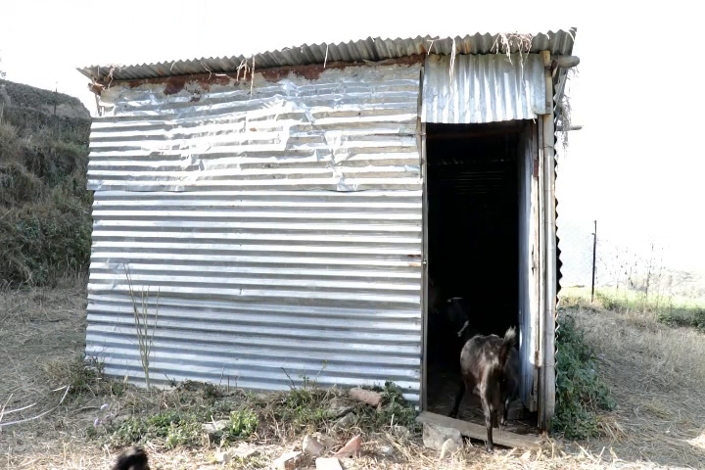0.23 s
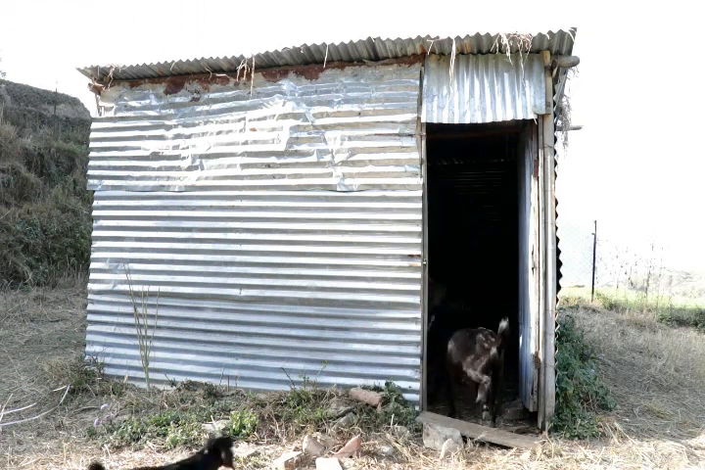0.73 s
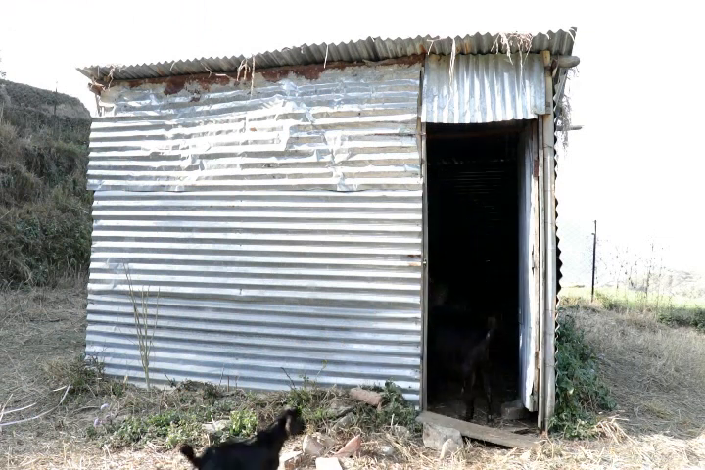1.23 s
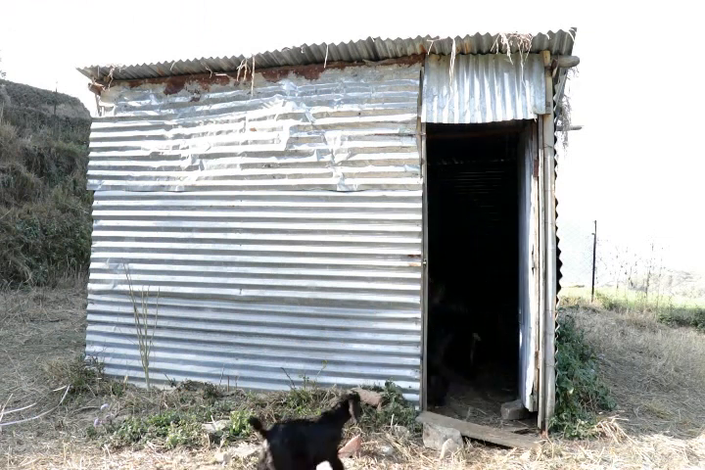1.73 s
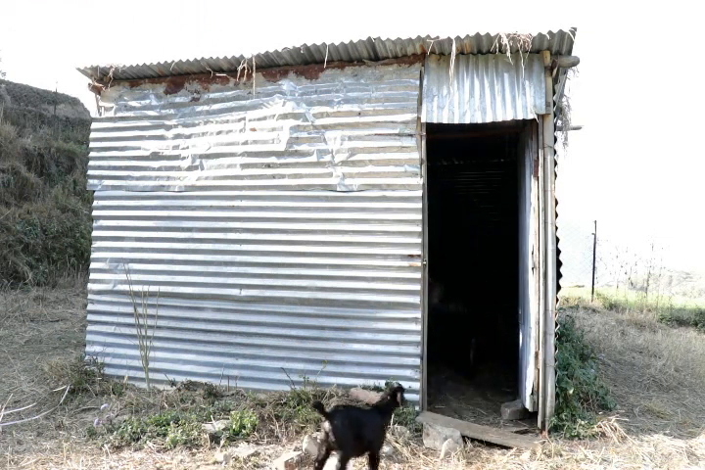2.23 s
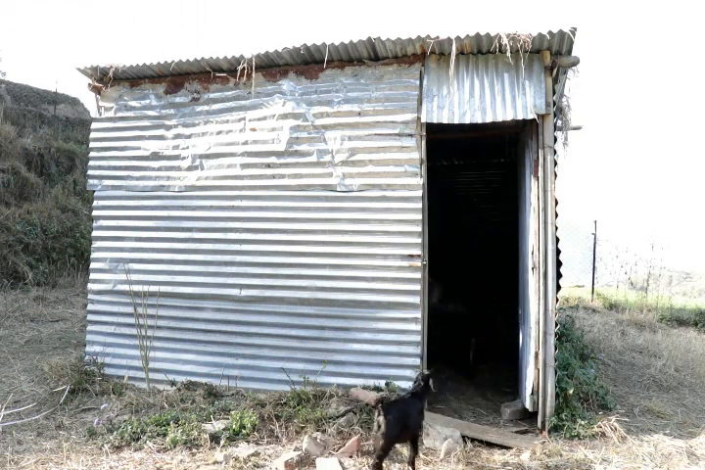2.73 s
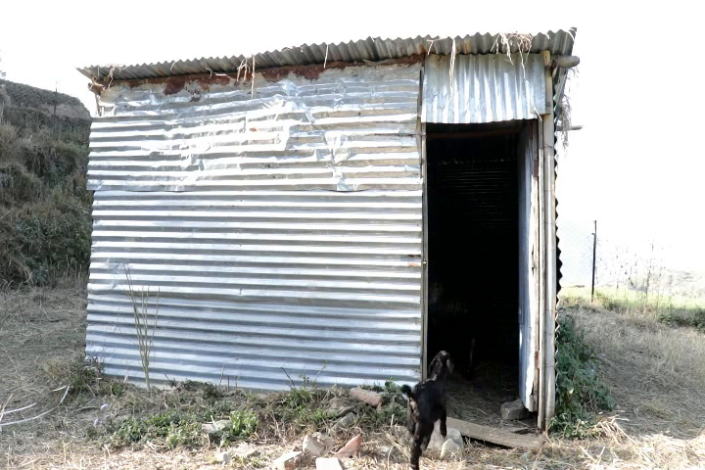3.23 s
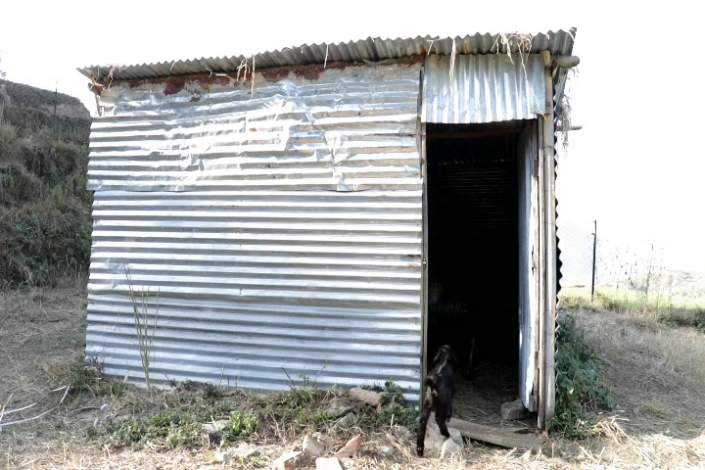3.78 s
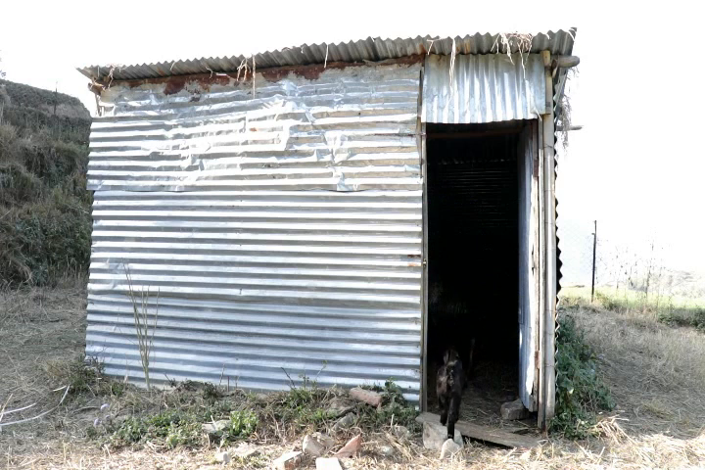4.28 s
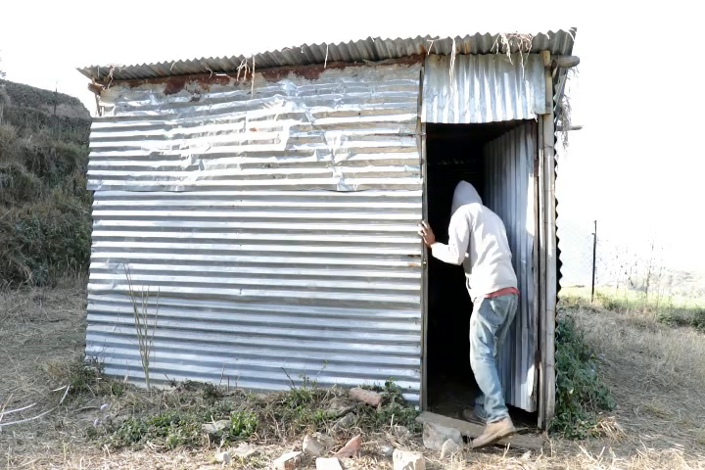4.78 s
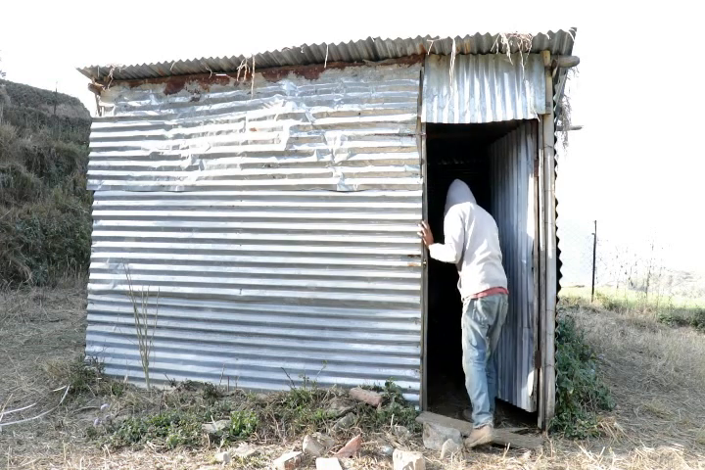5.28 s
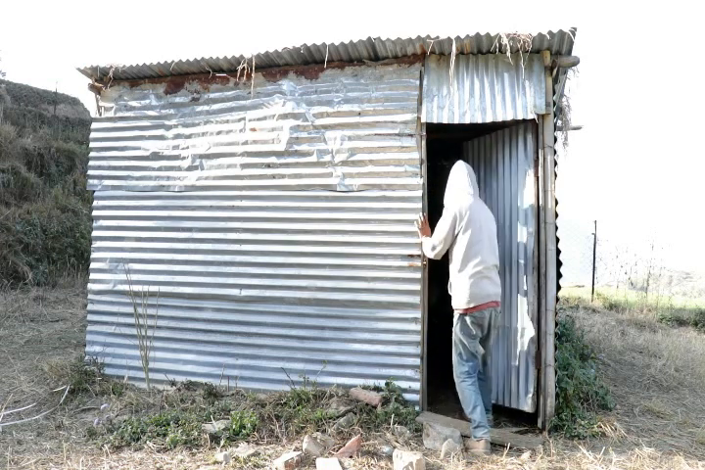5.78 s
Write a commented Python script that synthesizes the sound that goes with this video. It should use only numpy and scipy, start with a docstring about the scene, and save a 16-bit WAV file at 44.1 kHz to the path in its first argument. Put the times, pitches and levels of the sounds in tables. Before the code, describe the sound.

Goats shuffle through dry straw, their hooves knocking lightly on boards. One hard, loud bang sets a corrugated iron shed booming and ringing out. The soft steps go on with a few faint bird chirps, then a sheet-metal door is dragged, scraping, juddering and slapping its frame before a dull bump. Heard outdoors from a few metres away, over a light breeze and low rumble.

```python
"""Goats shuffle through dry straw and knock on boards, until one hard blow sets an iron shed booming.
Its corrugated sheets ring out in a wash of metal modes. Later the sheet door is dragged: it scrapes,
judders and slaps against its frame, ending on a dull bump. Thin squeaks and bird chirps echo off the
walls, and a light breeze with a low rumble lies under it all."""
import sys
import numpy as np
from scipy import signal
from scipy.fft import rfft, irfft, next_fast_len
from scipy.io import wavfile
from scipy.ndimage import map_coordinates

SR = 44100
rng = np.random.default_rng(int(sys.argv[2]) if len(sys.argv) > 2 else 0)


def dump_mix(stems):
    """Bounce the given channels to the path in sys.argv[1] as a 16-bit WAV at rate SR."""
    frames = np.atleast_2d(stems).T  # one column per channel
    limited = np.clip(frames, -1, 1)  # hard clip at full scale
    pcm = np.round(limited * 32767).astype(np.int16)
    wavfile.write(sys.argv[1], SR, pcm)


N = 265041

# tone colour of the door leaf, slapped or scraped: f/Hz, level/dB
DOOR_COLOUR = [(35, -17), (95, -4), (170, 1), (250, -10), (380, -0.5), (600, 1), (860, 2.5), (1300, 2.5),
               (1700, 0), (2500, -2.5), (3800, -7), (5000, -4), (6500, -17), (10000, -16.5), (15000, -22)]


def amp(db):
    """Decibels to gain."""
    return 10 ** (np.asarray(db) / 20)


def unit(x):
    """Scale to rms 1."""
    return x / np.sqrt(np.mean(x ** 2) + 1e-20)


def along(points, hz):
    """Read a curve of (f/Hz, value) points on a log frequency axis."""
    f, v = np.transpose(points)
    return np.interp(np.log(hz + 1), np.log(f), v)


def wobble(rate, size=N):
    """Smooth random modulation, rate knots a second."""
    knots = rng.standard_normal(int(size * rate / SR) + 4)
    return map_coordinates(knots, [np.arange(size) * rate / SR])


def filtered(x, response):
    """Equalise x with the gain curve response(hz)."""
    m = next_fast_len(len(x) + SR // 2)
    return irfft(rfft(x, m) * response(np.fft.rfftfreq(m, 1 / SR)), m)[:len(x)]


def noise(colour_db, size=N):
    """Noise of rms 1 with the spectral shape colour_db(hz)."""
    return unit(filtered(rng.standard_normal(size), lambda hz: amp(colour_db(hz))))


def dying(x, decay):
    """Let each frequency of x fade at its own speed, given as (f/Hz, t60/s) points."""
    hz, t, spectrum = signal.stft(x, SR, nperseg=256)
    damping = amp(-60 * t / along(decay, hz)[:, None])
    return signal.istft(spectrum * damping, SR, nperseg=256)[1][:len(x)]


def fade(t, t60):
    """Exponential decay by 60 dB in t60 seconds."""
    return np.exp(-np.log(1000) * t / t60)


def attack(t, rise_s):
    """Onset from 0 to 1 with time constant rise_s."""
    return 1 - np.exp(-t / rise_s)


def tone(hz, t60, t):
    """One ringing mode, struck at a random phase."""
    return fade(t, t60) * np.sin(2 * np.pi * (hz * t + rng.random()))


def add(track, s, sound):
    """Mix a sound into the track at s seconds."""
    part = track[max(round(s * SR), 0):][:len(sound)]
    part += sound[:len(part)]


def dense_ring(colour_db, decay, thump_db, body_db, edge_db):
    """A second of crowded modes; where and how hard a contact lands sets the balance of four bands."""
    edges_hz = [30, 250, 700, 2900, 16000]  # thump, body, mids (at 0 dB), edge
    ring = noise(colour_db, size=SR)
    bands = [unit(filtered(ring, lambda hz: 1 / (1 + (lo / (hz + 1)) ** 10) / (1 + (hz / hi) ** 10)))
             for lo, hi in zip(edges_hz, edges_hz[1:])]
    return dying(amp([thump_db, body_db, 0, edge_db]) @ np.array(bands), decay)


def air(rumble_db=-52, breeze_db=-54):
    """The outdoor bed: a light, gently wavering breeze over a low rumble."""
    # tone colours of the rumble and the breeze: f/Hz, level/dB
    rumble_colour = [(12, -37), (20, -13), (45, 2.5), (70, -1), (105, 0.5), (166, -5), (300, -9.5),
                     (500, -16.5), (900, -82)]
    breeze_colour = [(120, -21), (220, 2.5), (500, 5), (820, 1.5), (1400, -2.5), (2700, -7), (4900, -14.5),
                     (15000, -21.5)]
    buffet_db, gust_db = 1.2 * wobble(7), .7 * wobble(9)
    rumble = amp(rumble_db + buffet_db) * noise(lambda hz: along(rumble_colour, hz))
    breeze = amp(breeze_db + gust_db) * noise(lambda hz: along(breeze_colour, hz))
    return rumble + breeze


def glide(length, start_hz, fall_oct_per_s, rough, bend=1):
    """A thin falling tone that swells and fades; pitch jitter gives it rasp."""
    progress = np.linspace(0, 1, int(length * SR))
    jitter = 1 + rough * wobble(900, size=SR)[:len(progress)]
    hz = start_hz * 2 ** (-fall_oct_per_s * length * progress ** bend) * jitter
    swell = np.sqrt(np.abs(np.sin(np.pi * progress)))
    return swell * np.sin(2 * np.pi * np.cumsum(hz) / SR)


def birds(length_s=.07):
    """Small, clean chirps: each holds its pitch, then drops ever faster."""
    # bird calls: t/s, starting f/Hz, level/dB
    calls = [(2.968, 3050, -51.5), (3.975, 4100, -64), (4.18, 4750, -56.5), (4.456, 4580, -53)]
    out = np.zeros(N)
    for s, start_hz, db in calls:
        add(out, s, amp(db) * glide(length_s, start_hz, fall_oct_per_s=5.6, rough=.035, bend=1.6))
    return out


def squeaks():
    """Thin, rasping squeaks that sag in pitch."""
    # squeaks: t/s, length/s, starting f/Hz, level/dB, jitter/share of pitch
    cues = [(1.106, .06, 2990, -50, 0.075), (1.18, .09, 2960, -46.5, .067), (1.128, .13, 2497, -42, .07),
            (1.204, .04, 1900, -40, 0.196), (3.238, .028, 3500, -42, .25), (4.124, 0.024, 3510, -48, 0.19)]
    out = np.zeros(N)
    for s, length, start_hz, db, rough in cues:
        add(out, s, amp(db) * glide(length, start_hz, fall_oct_per_s=1.1, rough=rough))
    return out


def yard_echo(sound, wet_db=1):
    """A sound plus its short, bright reverb off the iron walls."""
    # reverb time of the yard: f/Hz, t60/s
    decay = [(200, 0.16), (3000, 0.32), (10000, 0.38)]
    tail = dying(rng.standard_normal(SR // 2), decay)
    return sound + amp(wet_db) * signal.fftconvolve(sound, tail / np.linalg.norm(tail))[:N]


def straw(grain_db=2, crackles_per_s=50, crackle_db=9, contrast=.47):
    """Dry stalks rustle in fine grains, crackle, swish underfoot and now and then snap."""
    # stalks snapping, and straw swishing underfoot: t/s, level/dB
    snaps = [(.125, -36.5), (.274, -40.5), (.372, -41), (.65, -43), (.918, -40.5), (.948, -42),
             (.9702, -33.5), (1.011, -36), (1.941, -38.5), (2.024, -38.5), (2.282, -39.5), (2.401, -39),
             (2.511, -37.5), (4.27, -40), (4.652, -42)]
    swishes = [(.034, -42.5), (.135, -37.5), (.46, -39.5), (.51, -39), (.552, -41), (.699, -42),
               (.872, -44.5), (0.929, -47), (1.016, -41.5), (1.15, -43.5), (1.45, -47), (1.55, -41),
               (2.14, -42.5), (2.27, -45.5), (2.4, -45), (2.81, -45), (3.565, -42.5), (3.75, -50),
               (4.267, -47), (5.96, -47.5)]
    # tone colour of dry straw: f/Hz, level/dB
    colour = [(600, 3.5), (2000, 0.5), (5000, 2), (11000, 1.5), (13500, 1.5), (15800, -4.5)]
    # base contour of the rustle: t/s, level/dB
    contour = [(0.0, -58), (0.56, -55), (0.71, -59), (1.48, -56.5), (1.69, -54.5), (1.83, -57), (2.49, -57),
               (2.72, -52.5), (3.0, -58.5), (3.29, -60), (3.46, -57.5), (3.68, -58), (4.12, -60),
               (4.7, -61)]
    strokes, t = np.zeros(N), np.arange(SR // 2) / SR
    for s, db in snaps:
        add(strokes, s, amp(db) * fade(t, t60=.017) * attack(t, rise_s=.00038))
    for s, db in swishes:
        add(strokes, s, amp(db) * fade(t, t60=.21) * attack(t, rise_s=.0094))
    grains = unit(noise(lambda hz: along(colour, hz)) * amp(grain_db * wobble(900)))
    breaks = (rng.random(N) < crackles_per_s / SR) * rng.random(N)
    crackle = amp(crackle_db) * signal.fftconvolve(breaks, fade(t, t60=.0091))[:N]
    level_db = np.interp(np.arange(N) / SR, *np.transpose(contour))
    level_db += contrast * (level_db - level_db.mean())  # busy moments stand out from the lulls
    rustle = amp(level_db + .17 + 1.6 * wobble(32)) * np.hypot(1, crackle)
    return np.hypot(strokes, rustle) * grains  # the envelopes add in power


def hoof_knock(t, ring_hz, ring_db, chatter_db=4.5):
    """One hoof on a board or scrap of tin, ringing briefly; lower pitches get more thump, less clack."""
    # tone colour of a knock: f/Hz, level/dB
    colour = [(40, -20), (110, -9.5), (200, 2), (330, -6.5), (500, -6.5), (1200, 11), (2200, 2),
              (3800, -14), (5500, -25), (14000, -49)]
    # ring time of a knock: f/Hz, t60/s
    decay = [(150, 0.35), (1000, 0.26), (4000, 0.26), (12000, 0.042)]
    depth_db = 3.5 * np.log2(1000 / ring_hz)  # grows with each octave below 1 kHz
    dense = dense_ring(lambda hz: along(colour, hz), decay,
                       thump_db=-5 + 2 * depth_db, body_db=-3 + depth_db, edge_db=-9.5)
    dense *= amp(chatter_db * wobble(147, size=SR) - max(depth_db, 0))
    ring = amp(ring_db) * tone(ring_hz, t60=.22, t=t)
    return (dense + ring) * attack(t, rise_s=.00044)


def hooves(gain_db=-8, patter_span_s=(.05, 4.6), step_gap_s=.21):
    """Goats stepping about: clear knocks over a faint, uneven patter."""
    # hooves on boards, stones and loose tin: t/s, relative level/dB, ring f/Hz, ring mix/dB
    clear_steps = [(.166, -40.5, 468, 8), (.232, -53, 222, 13), (.265, -52.5, 227, 12),
                   (0.351, -41, 1210, -8), (.51, -42, 243, 7), (.522, -37, 950, -1), (.542, -48, 797, 5),
                   (.569, -48, 860, 2), (.877, -47.5, 558, 4), (1.432, -47.5, 538, 7),
                   (1.477, -40, 900, -14), (1.574, -41, 136, 11.5), (2.232, -42, 1710, -2),
                   (2.402, -42, 1175, 6), (2.422, -48, 1212, 9.5), (2.514, -49.5, 2180, 5),
                   (2.725, -43.5, 794, -8), (2.793, -46.5, 1360, -3), (3.012, -41, 597, -2),
                   (3.03, -41.5, 1374, -1), (3.088, -46, 1410, -2), (3.24, -42.5, 750, -11),
                   (4.107, -43.5, 1440, 0), (4.297, -46.5, 500, 14), (4.551, -48.5, 2020, 1)]
    out, t = np.zeros(N), np.arange(SR) / SR
    for s, db, ring_hz, ring_db in clear_steps:
        add(out, s, amp(db + gain_db) * hoof_knock(t, ring_hz, ring_db))
    for s in np.arange(*patter_span_s, step_gap_s):
        late, force, pitch = rng.standard_normal(3)
        step = hoof_knock(t, ring_hz=1000 * 2 ** (.5 * pitch), ring_db=-3)
        add(out, s + .3 * step_gap_s * late, amp(-55 + 1.5 * force + gain_db) * step)
    return out


def door_scrape(level_db=-49, judder_db=2, lowpass_hz=1500):
    """Under the slaps, the dragged leaf scrapes softly along the sill."""
    # the pull on the door: start t/s, full t/s, easing t/s, at rest t/s
    pull = (4.73, 5.2, 5.7, 6.15)
    effort = np.interp(np.arange(N) / SR, pull, [0, 1, 1, 0])
    rub = noise(lambda hz: along(DOOR_COLOUR, hz) - 10 * np.log10(1 + (hz / lowpass_hz) ** 2))
    return effort * amp(level_db + judder_db * wobble(40)) * rub


def door_slap(t, weight_db, sizzle_db, sink_oct_per_db=.3):
    """One contact of the door leaf; the more of its weight lands, the deeper it rings."""
    # the leaf's strongest modes: f/Hz, relative level/dB, t60/s
    leaf_modes = [(375, -5.5, 0.84), (464, -7, 0.81), (653, -1, 0.56), (713, -10, .6), (848, 3.5, 0.4),
                  (884, 0, 0.41), (1100, -7, 0.24), (1180, 4.5, 0.32), (1247, -3, 0.6), (1327, -5, 0.37),
                  (1464, -2, 0.28), (1635, 6, 0.14), (1820, -1, 0.14), (2043, -3.5, 0.19), (2577, -8, 0.91),
                  (3630, -9.5, 0.29)]
    # ring time of its dense modes: f/Hz, t60/s
    decay = [(100, 0.68), (400, 1), (900, 0.56), (2000, 0.38), (5000, 0.31), (12000, 0.2)]
    centre_hz = 1160 * 2 ** (-sink_oct_per_db * weight_db)

    def focus_db(hz):
        """A bell boost: each contact point favours its own modes."""
        return 4.5 * np.exp(-(np.log2((hz + 1) / centre_hz) / .5) ** 2)

    dense = dense_ring(lambda hz: along(DOOR_COLOUR, hz) + focus_db(hz), decay,
                       thump_db=-15 + weight_db, body_db=-10 + .71 * weight_db, edge_db=sizzle_db)
    dense *= amp(-.5 * wobble(160, size=SR) * fade(t, t60=.3))  # loose edges bounce just after the hit
    modes = sum(amp(db + focus_db(hz) + rng.normal(0, 4.76)) * tone(hz, t60, t)
                for hz, db, t60 in leaf_modes)
    punch = amp(3 * np.exp(-t / .042)) * attack(t, rise_s=.00084)
    return punch * (dense + amp(-14) * modes)


def door_rattle(gain_db=-8.5, rebound_s=.05, rebound_db=-16, duller_db=-5):
    """The thin leaf judders over the sill and slaps its frame, each time with a duller rebound."""
    # the door's contacts: t/s, relative level/dB, weight behind it/dB, sizzle/dB
    hits = [(4.729, -41, 9, -9), (4.749, -32.5, 3, -13.5), (4.773, -31, -0.5, -18),
            (4.811, -27.5, -1.5, -16.5), (4.906, -34.5, -1.5, -20), (4.995, -26.5, -2.5, -16),
            (5.093, -21.5, -1, -22.5), (5.176, -30.5, -2.5, -26), (5.2, -26.5, -2, -10.5),
            (5.217, -21, 0, -9.5), (5.333, -27.5, -2, -18), (5.347, -29.5, -4, -16.5),
            (5.539, -20.3, 8, -6.5), (5.664, -42, 14.5, -16), (5.699, -38, 12.5, -2.5),
            (5.774, -44, 31, -31)]
    out, t = np.zeros(N), np.arange(SR) / SR
    for s, db, weight_db, sizzle_db in hits:
        add(out, s, amp(db + gain_db) * door_slap(t, weight_db, sizzle_db))
        rebound = door_slap(t, weight_db, sizzle_db + duller_db)
        add(out, s + rebound_s, amp(db + gain_db + rebound_db) * rebound)
    return out


def wall_boom(t, crossover_hz=1400, clash_delay_s=.011, push_hz=720):
    """A short push sets the sheets booming; their loose overlaps clash brightly an instant later."""
    # the wall's strongest modes: f/Hz, relative level/dB, t60/s
    sheet_modes = [(246, -11, 2.2), (254, -11, 1.3), (294, -5, .9), (379, -11, 1.0), (660, -10, .9),
                   (695, -4, .7), (723, -2, .72), (757, -6, .55), (914, -7, .65), (1146, -7, .58),
                   (1653, -7, .35), (1923, -9, .35), (2001, -7, .4), (2194, -3, .36), (2768, -6, .33),
                   (3116, -12, .36), (3629, -6, .36), (4381, -12, .3)]
    # tone colour of the dense modes between them: f/Hz, level/dB
    colour = [(35, -42), (80, -11.5), (160, -6), (220, 0.5), (330, -0.5), (480, -2), (740, 0.5),
              (1000, -2.5), (1500, -1.5), (2400, -2.5), (3500, -4), (5100, -5), (5900, -15), (9500, -16),
              (15500, -29)]
    # ring time of the dense modes: f/Hz, t60/s
    decay = [(80, 2.84), (250, 1.05), (500, 1.44), (720, 1.04), (1000, 0.65), (1600, 0.55), (2600, 0.44),
             (4200, 0.3), (7000, 0.27), (14000, 0.14)]
    dense = dying(noise(lambda hz: along(colour, hz), size=len(t)), decay)
    boom = filtered(dense, lambda hz: 1 / (1 + (hz / crossover_hz) ** 4))
    duck_db = -7 * (1 - np.tanh((t - clash_delay_s) / .0026)) / 2  # treble held back until the clash
    clash = (dense - boom) * amp(duck_db)
    modes = sum(amp(db) * tone(hz, t60, t) for hz, db, t60 in sheet_modes)
    bloom = modes * attack(t, rise_s=.012)
    push = -np.sin(2 * np.pi * push_hz * t) * fade(t, t60=.029)
    mix = amp(-14.5) * (boom + clash) + amp(-20) * bloom + amp(-10) * push
    return mix * attack(t, rise_s=.00019)


def wall_blows():
    """A hard bang on the shed wall, later a dull bump: a soft contact wakes only the low modes."""
    # blows on the wall: t/s, level/dB, low-pass f/Hz
    blows = [(1.7256, -0.5, 18000), (5.774, -16, 640)]
    out, t = np.zeros(N), np.arange(2 * SR) / SR
    for s, db, lowpass_hz in blows:
        softness = signal.butter(2, lowpass_hz, fs=SR, output="sos")
        add(out, s, amp(db) * signal.sosfilt(softness, wall_boom(t)))
    return out


def scene():
    """The mono mix, heard from a few metres in front of the shed."""
    shed = wall_blows() + door_rattle() + door_scrape()
    return (shed + straw() + yard_echo(squeaks() + birds()) + air() + hooves())[None]


def record(dry, top_hz=15800):
    """A brick-wall low-pass trims the very top of the treble."""
    return np.array([filtered(channel, lambda hz: hz < top_hz) for channel in dry])


dry = scene()
out = record(dry)
dump_mix(out)
```